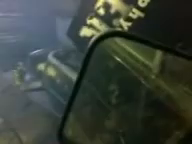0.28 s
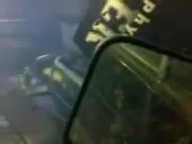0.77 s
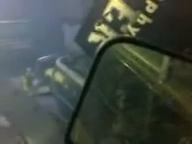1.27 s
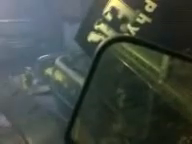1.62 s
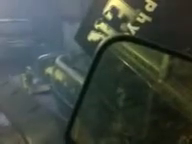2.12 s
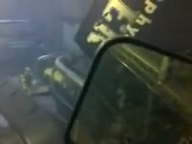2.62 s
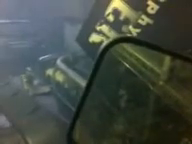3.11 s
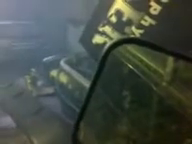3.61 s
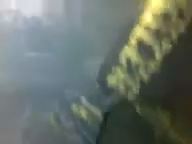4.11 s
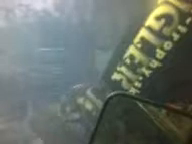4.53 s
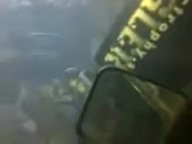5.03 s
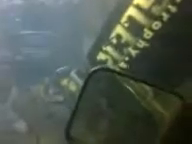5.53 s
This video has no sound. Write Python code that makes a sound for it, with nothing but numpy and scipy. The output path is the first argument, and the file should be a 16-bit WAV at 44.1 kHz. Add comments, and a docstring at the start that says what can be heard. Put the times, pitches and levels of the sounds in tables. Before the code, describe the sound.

A turbocharged engine is heard close up in a vehicle cab through a dull, narrow-band microphone. It climbs to the top of a loud, rough rev at about 0.15-0.3 s, with two tiny sharp overload clicks near 0.12 s. It then winds down, rasping, clattering and hissing. The exhaust coughs softly at 0.4 s, pops more strongly in a quick cluster around 0.9 s, and faintly at 1.05 s. Short, drooping mid-high whistles chirp in pairs near 0.7 and 1.0-1.1 s, then at 1.4, 1.6 and, fainter, 2.1-2.2 s. Low booming swells as the pitch falls through the cab's resonance. By 3 s it is a fairly fast, pulsing idle, growing quieter and thinner until about 4.7 s. It stumbles slightly near 3.6 and 5.0 s. From 5.5 s the engine surges upward again, with one higher chirp at 5.6 s, and ends still rising.

```python
"""A turbocharged engine, heard from the cab, tops a rev, winds down to a fast idle, then starts to rev again.
Two sharp overload clicks sound near the top of the first rev. Low shaft orders boom as they pass the cab's
resonance; gas noise pulsed by each firing makes the exhaust rasp, shaft-locked knocks the metal clatter, and a
flickering high band the intake hiss. Decaying noise bursts pop in the exhaust as the engine slows; drooping sine
whistles are the turbo's chirps, most of them on the wind-down and one as the next rev begins."""
import sys
import numpy as np
from scipy import signal
from scipy.fft import rfft, irfft
from scipy.io import wavfile
from scipy.ndimage import uniform_filter1d

SR = 44100
rng = np.random.default_rng(int(sys.argv[2]) if len(sys.argv) > 2 else 0)


def digitize_waveform(pressure):
    """Quantize a signal to 16-bit integers and store it at the path in sys.argv[1].

    Rows of a 2-D input are taken as channels; values are limited to [-1, 1].
    """
    field = np.atleast_2d(pressure).T
    bounded = np.clip(field, -1, 1)
    quanta = np.round(bounded * 32767).astype(np.int16)
    wavfile.write(sys.argv[1], SR, quanta)


N = 254016
TIME, FREQ = np.arange(N) / SR, np.fft.rfftfreq(N, 1 / SR)
IDLE_HZ = 39  # shaft speed at idle


def amp(db):
    """Decibels to gain."""
    return 10 ** (np.asarray(db) / 20)


def unit(x):
    """Scales to rms 1."""
    return x / np.sqrt(np.mean(x ** 2) + 1e-20)


def spectrum(points):
    """Joins (Hz, dB) points on a log-frequency axis."""
    hz, db = np.transpose(points)
    return np.interp(np.log(FREQ + 1), np.log(hz + 1), db)


def colour(x, db):
    """Minimum-phase filter with the given gain at each frequency, floored at -100 dB."""
    cepstrum = irfft(np.maximum(db, -100) * np.log(10) / 20, N)
    # fold onto positive time: the filter becomes causal
    cepstrum[1:N // 2] *= 2
    cepstrum[N // 2 + 1:] = 0
    response = np.exp(rfft(cepstrum))
    return irfft(rfft(x) * response, N)


def wander(rate_hz):
    """Slow random signal of rms 1: low-passed noise."""
    noise = rfft(rng.standard_normal(N))
    return unit(irfft(noise / (1 + (FREQ / rate_hz) ** 2) ** 2, N))


def band(x, low_hz, high_hz):
    """One band of a sound, with soft edges."""
    def below(hz):
        return 1 / (1 + (FREQ / hz) ** 16)
    return irfft(rfft(x) * (below(high_hz) - below(low_hz)), N)


def low_pass(x, hz):
    """A steep linear-phase band limit."""
    taps = signal.firwin(801, hz, window=("kaiser", 9), fs=SR)
    return signal.oaconvolve(x, taps[None], "same")


def flutter(x, patchy_db):
    """Neighbouring pitches swell and fade on their own, in patches of about a tenth of a second."""
    z = signal.stft(x, nperseg=2048, noverlap=1536)[2]
    field = uniform_filter1d(rng.standard_normal(z.shape), size=3, axis=0)
    field = unit(uniform_filter1d(field, size=12, axis=1))
    return signal.istft(z * amp(patchy_db * field), nperseg=2048, noverlap=1536)[1][:N]


def shaft_speed():
    """Shaft speed in Hz: top of the rev, wind-down, an idle that stumbles twice, next rev."""
    # Each row: time in seconds, shaft speed in Hz.
    speed_points = [(0, 114), (0.15, 130), (0.29, 131), (0.55, 106), (1, 79), (1.22, 65.5), (1.68, 52.2),
                    (2.1, 46.3), (2.55, 41.6), (3, 39.8), (3.52, 39), (3.62, 37.4), (4.05, 38.9),
                    (4.75, 38.6), (4.93, 39.5), (5.04, 37.4), (5.22, 39.1), (5.53, 40), (5.61, 46),
                    (5.76, 62.9)]
    time_s, speed_hz = np.transpose(speed_points)
    return np.interp(TIME, time_s, speed_hz)


def throttle_for(speed):
    """The throttle is open as far as it takes to speed the shaft up, and shut while it slows."""
    full_throttle = 13100  # acceleration times speed, Hz squared per s
    power = np.maximum(np.gradient(speed) * SR, 0) * speed
    return uniform_filter1d(power, size=4410) / full_throttle


def moved():
    """How far the microphone has moved, 0-1; the idle grows quieter and thinner."""
    move_from_s, move_s = 2.74, 2
    return np.clip((TIME - move_from_s) / move_s, 0, 1)


def loudness(layer, speed, throttle):
    """A layer's level in dB: it grows with speed and throttle, and eases as the microphone moves."""
    loudest_hz = 122  # speed adds no more level above this
    bend = 1.074
    idle_db, revved_db, throttle_db, moved_db = layer
    revved = np.clip((speed - IDLE_HZ) / (loudest_hz - IDLE_HZ), 0, 1) ** bend
    return idle_db + revved_db * revved + throttle_db * throttle + moved_db * moved()


def overload_clicks():
    """Overload clicks: 1700 Hz pulses under a submillisecond bell."""
    # Each row: time in seconds, signed peak pressure.
    click_events = [(.1178, 1.0), (.124, -1.0)]
    out = np.zeros(N)
    for s, peak in click_events:
        t = TIME - s
        out += peak * np.cos(2 * np.pi * 1700 * t) * np.exp(-(t / .0003) ** 2)
    return out


def pops():
    """Unburnt fuel coughs in the pipe on the overrun: fast-rising, decaying bursts of coloured noise."""
    # Each row: start in seconds, level in dB ahead of the 2 ms attack, decay in seconds.
    pop_events = [(0.423, -21, 0.024), (0.875, -11.5, 0.015), (0.904, -17.5, 0.011), (0.925, -20.5, 0.016),
                  (1.046, -29.5, 0.028)]
    # Each row: frequency in Hz, spectral level in dB.
    pop_colour = [(40, -30.5), (110, -12), (200, 2.5), (320, -2.5), (500, 1.5), (730, -4.5), (890, -3),
                  (1050, -6), (1600, -7.5), (4000, -34)]
    level = np.zeros(N)
    for s, db, decay_s in pop_events:
        age_s = np.maximum(TIME - s, 0)
        level += amp(db) * (1 - np.exp(-age_s / 0.002)) * np.exp(-age_s / decay_s)
    noise = rng.standard_normal(N)
    return level * unit(colour(noise, spectrum(pop_colour)))


def turbo():
    """Short wavering whistles as the boost spills back through the compressor."""
    # Each row: centre time in seconds, peak level in dB before the waver, mean pitch in Hz.
    chirp_events = [(.67, -21, 1410), (0.723, -22, 1332), (0.996, -20, 1340), (1.101, -25, 1465),
                    (1.388, -26, 1314), (1.633, -27, 1338), (2.11, -28, 1330), (2.19, -32.5, 1363),
                    (5.604, -27.5, 1635)]
    chirp_s = 0.024  # swell and fade, to 1/e
    out = np.zeros(N)
    pitch_waver = 1 + .008 * wander(90)
    for s, db, hz in chirp_events:
        near = abs(TIME - s) < 3 * chirp_s
        age = (TIME[near] - s) / chirp_s
        sag = 1 - .014 * np.tanh(age)  # each whistle droops in pitch
        phase = 2 * np.pi * np.cumsum(hz * pitch_waver[near] * sag) / SR
        out[near] += amp(db) * np.exp(-age ** 2) * np.sin(phase)
    return out * amp(1.4 * wander(150))


def boom(turns, speed, throttle):
    """Low orders, clean at idle and ragged at speed; each swells as it passes through the cab's resonance."""
    # Each row, one per shaft order from the first: level at idle in dB before the cab's lift,
    # rise in dB per Hz of speed, dB added by full throttle.
    order_levels = [(-69.5, 0.186, 1), (-60.5, 0.1487, 11), (-56.5, 0.0931, 2.5)]
    cab_hz, cab_width_hz, cab_lift_db = 118.9, 6.5, 22.5
    waver_db, waver_hz = 1.0, 12
    ragged = np.clip((speed - 62) / 90, .04, .45)
    out = np.zeros(N)
    for k, (idle_db, db_per_hz, throttle_db) in enumerate(order_levels, 1):
        detune = 2 * (k * speed - cab_hz) / cab_width_hz
        cab = np.sqrt(1 + amp(cab_lift_db) ** 2 / (1 + detune ** 2))
        level = cab * amp(idle_db + db_per_hz * (speed - IDLE_HZ) + throttle_db * throttle)
        level = level * amp(waver_db * wander(waver_hz))
        tone = np.exp(2j * np.pi * (k * turns + rng.random()))
        clean = np.sqrt(2) * (1 - ragged)
        rough = ragged * (wander(35) + 1j * wander(39))
        out += level * (tone * (clean + rough)).real
    return out


def firings(turns, decay, between, uneven_db):
    """A puff of gas noise at each firing, three to a turn, unevenly strong; decay in firing intervals."""
    # Each entry: strength in dB of one firing in the cycle, before random unevenness.
    cylinders_db = [0, 2, -3, -3.5, 1.9, -1]
    count = (3 * turns).astype(int)
    age = 3 * turns - count
    size_db = np.take(cylinders_db, count, mode="wrap") + uneven_db * rng.standard_normal(N)[count]
    envelope = between + amp(size_db) * np.exp(-age / decay)
    return unit(envelope * rng.standard_normal(N))


def repeating(turns, count):
    """What every two-turn cycle has in common: a dense comb of half orders in random phases."""
    grid = np.arange(8192) / 8192
    phases = rng.random((count, 1))
    half_orders = np.arange(5, count + 5)[:, None]
    cycle = np.cos(2 * np.pi * (half_orders * grid + phases)).sum(0)
    return unit(np.interp(turns / 2 % 1, grid, cycle))


def knocks(turns, count, uneven_db):
    """Sharp blows locked to the shaft, count to a turn, each of its own strength and random sign."""
    struck = np.diff(np.floor(turns * count), prepend=0) > 0
    blows = struck * amp(uneven_db * np.clip(rng.standard_normal(N), -2, 2))
    return unit(blows * rng.choice([-1, 1], N))


def through_body(drive, load):
    """Pipe, cab and metal resonances colour the drive; it fills out under load, thins as the microphone moves."""
    # Each row: frequency in Hz, spectral level in dB, before the resonances; on load, winding down, at idle.
    rev_colour = [(18, -55.5), (30, -30), (113, -2), (164, -9), (264, -6.5), (298, 0), (383, -3.5),
                  (567, -1.5), (806, -2.5), (875, -0.5), (1240, -3), (1770, -2.5), (2850, -17), (3430, -16),
                  (4220, -38.5), (5490, -64.5), (9280, -120)]
    coast_colour = [(18, -77), (30, -41.5), (86, -14), (118, -2), (136, -7), (151, -22), (228, -15),
                    (383, -16.5), (470, -10), (522, -15.5), (579, -13.5), (1630, -9), (2220, -21.5),
                    (3430, -19), (4220, -40.5), (5490, -80.5), (9280, -120)]
    idle_colour = [(18, -75.5), (30, -49), (81, -16), (118, -1.5), (136, -17.5), (151, -26.5), (324, -22),
                   (391, -23), (424, -22.5), (567, -21.5), (742, -21.5), (1700, -18), (2220, -31.5),
                   (3500, -28), (4220, -48), (5490, -78.5), (9280, -120)]
    # Each row: resonance in Hz, width in Hz, lift in dB as on the wind-down (scaled for load and idle).
    body_modes = [(218, 78, 5), (283, 25, -3.5), (303.2, 17, 5.5), (321.4, 10, 3.5), (357, 19, 5),
                  (380, 13, -4), (460, 9.4, 3), (483, 9.5, 2), (573.5, 48, 6), (612, 8.3, -4.5),
                  (676, 42, 4), (761.6, 15, 10.5), (767, 48, -4.5), (889, 33, 4.5), (977, 22, 3.5),
                  (1033, 17, 8), (1084, 12, 3), (1120, 35, 5.5), (1280, 80, -1.5), (1325, 47, 5.5),
                  (1419, 43, 4.5), (1520, 41, -1.5), (1577.5, 36, 6), (1716, 44, 4), (1900, 37, 1),
                  (2040, 270, -2.5), (2970, 180, -0.5), (3390, 350, 3.5), (3585, 130, 7.5), (3600, 100, -3)]
    lift_db = sum(db / (1 + (2 * (FREQ - hz) / width_hz) ** 2) for hz, width_hz, db in body_modes)
    boom_zone = np.exp(-((FREQ - 109) / 27) ** 2)  # here the low orders carry most of the sound
    revving = unit(colour(drive, spectrum(rev_colour) + 0.5 * lift_db - 3 * boom_zone))
    coasting = unit(colour(drive, spectrum(coast_colour) + lift_db - 12 * boom_zone))
    idling = unit(colour(drive, spectrum(idle_colour) + 1.16 * lift_db - 13 * boom_zone))
    unloaded = moved() * idling + (1 - moved()) * coasting
    return load * revving + (1 - load) * unloaded


def engine(turns, speed, throttle):
    """Exhaust rasp below, ringing metal in the middle, intake hiss on top."""
    # Each layer: level at idle in dB, dB added at top speed, by full throttle, once the microphone has moved.
    rasp_levels = (-35, 14, 3.5, -3.5)
    clatter_levels = (-34, 14.5, 1.5, -2)
    hiss_levels = (-43.5, 18, 2.5, -1.6)
    load = np.clip((speed - 50) / 65, 0, 1)

    gas = firings(turns, decay=0.57, between=0.92, uneven_db=2.5)
    gas = unit(gas + 0.23 * repeating(turns, count=90))
    metal = 0.64 * knocks(turns, count=12, uneven_db=3.5)
    metal = unit(metal + firings(turns, decay=0.86, between=0.91, uneven_db=2.5))
    air = firings(turns, decay=0.67, between=1.0, uneven_db=1.5)

    rasp = unit(band(through_body(flutter(gas, patchy_db=2.0), load), 14, 1140))
    clatter = unit(band(through_body(flutter(metal, patchy_db=2.5), load), 1074, 2120))
    # the hiss flutters most in its upper band
    intake = through_body(air + .8 * metal, load)
    hiss = band(intake, 1944, 3150) * amp(1.4 * wander(30))
    hiss = unit(hiss + band(intake, 3180, 6000) * amp(2.4 * wander(30)))

    layers = [(rasp, rasp_levels), (clatter, clatter_levels), (hiss, hiss_levels)]
    return sum(sound * amp(loudness(levels, speed, throttle)) for sound, levels in layers)


def scene():
    """One shaft drives the boom and the engine; clicks, pops and chirps come at set times."""
    speed = shaft_speed()
    throttle = throttle_for(speed)
    turns = np.cumsum(speed * (1 + .003 * wander(20))) / SR
    bursts = overload_clicks() + pops() + turbo()
    return (bursts + boom(turns, speed, throttle) + engine(turns, speed, throttle))[None]


def record(dry):
    """A narrow-band microphone rounds off the peaks; the highest still overload the next stage."""
    mic_limit, clip_level = .9, .71
    edge_hz, top_hz = 4480, 15800
    narrow = low_pass(mic_limit * np.tanh(dry / mic_limit), edge_hz)
    return low_pass(np.clip(narrow, -clip_level, clip_level), top_hz)


dry = scene()
out = record(dry)
digitize_waveform(out)
```